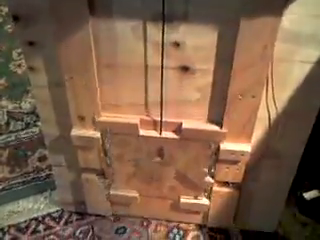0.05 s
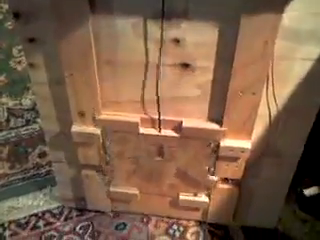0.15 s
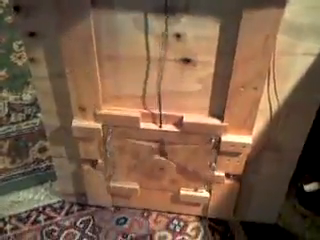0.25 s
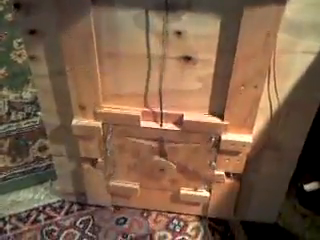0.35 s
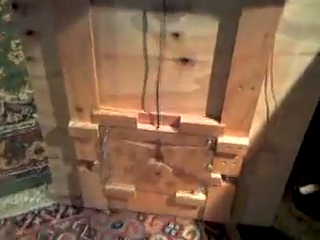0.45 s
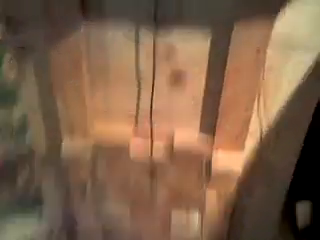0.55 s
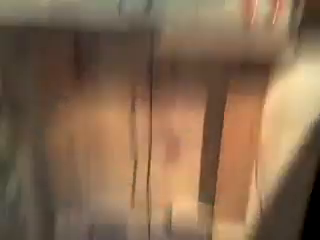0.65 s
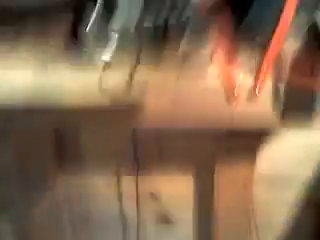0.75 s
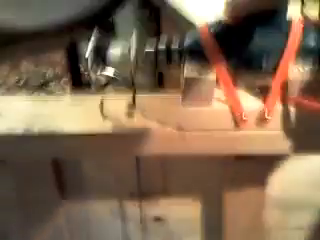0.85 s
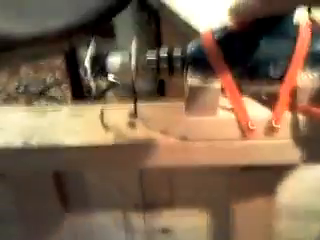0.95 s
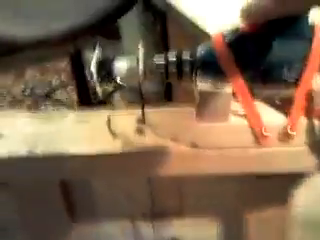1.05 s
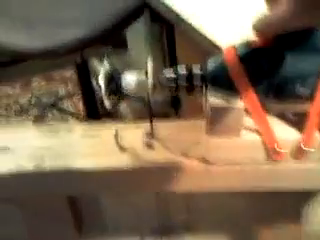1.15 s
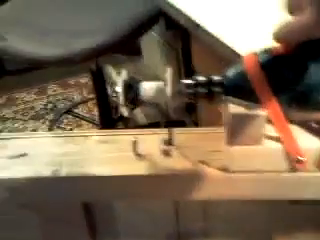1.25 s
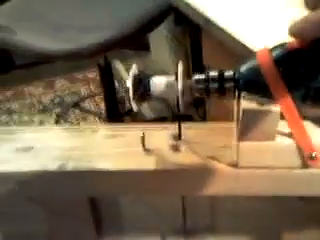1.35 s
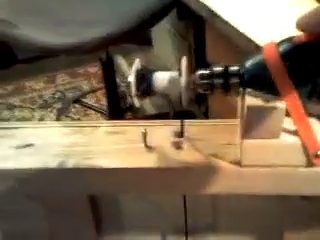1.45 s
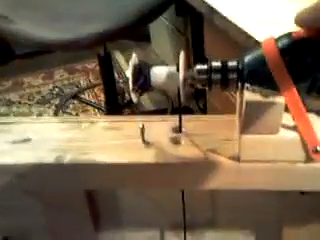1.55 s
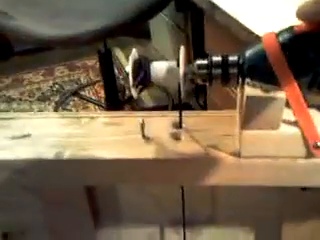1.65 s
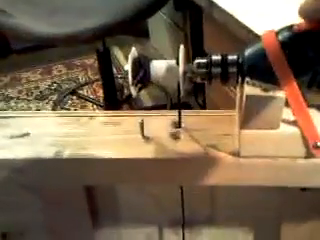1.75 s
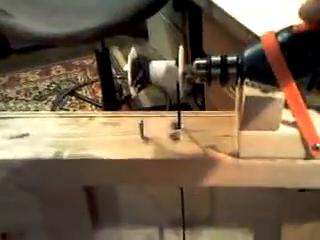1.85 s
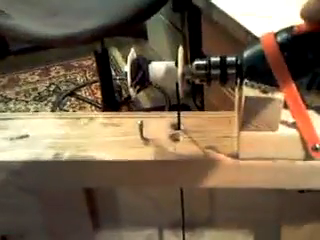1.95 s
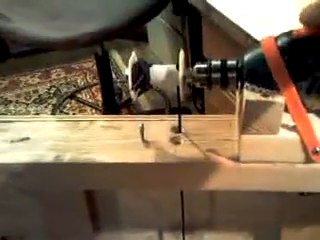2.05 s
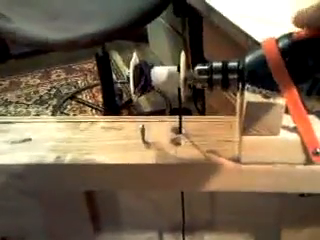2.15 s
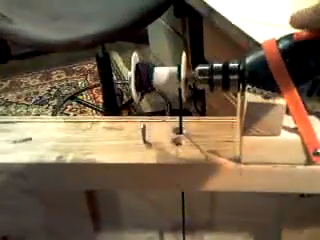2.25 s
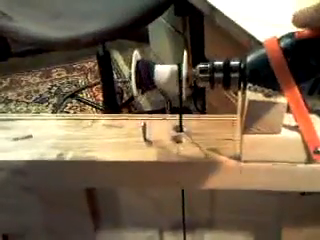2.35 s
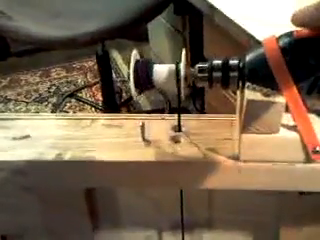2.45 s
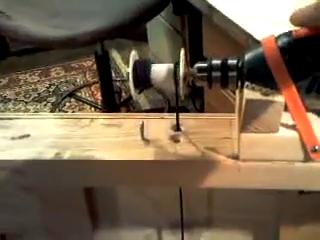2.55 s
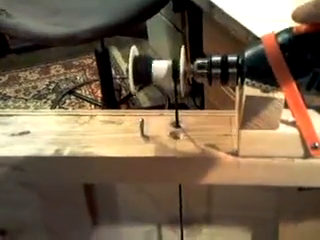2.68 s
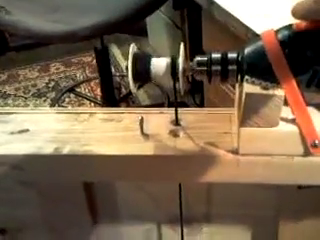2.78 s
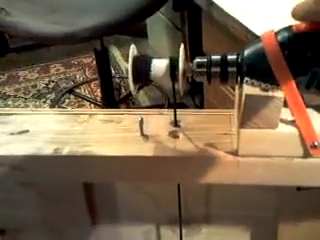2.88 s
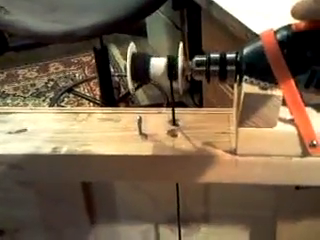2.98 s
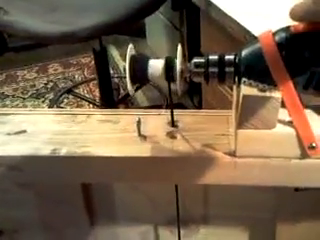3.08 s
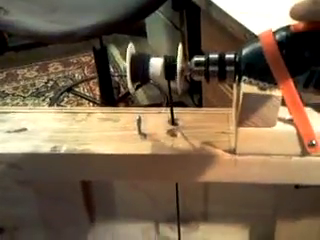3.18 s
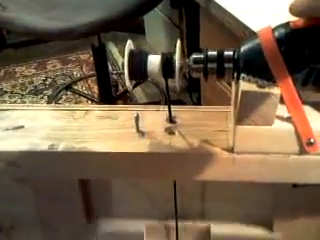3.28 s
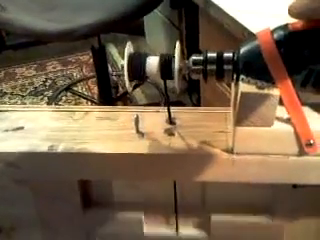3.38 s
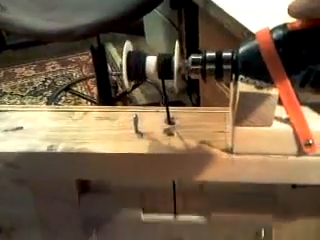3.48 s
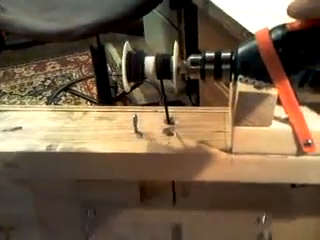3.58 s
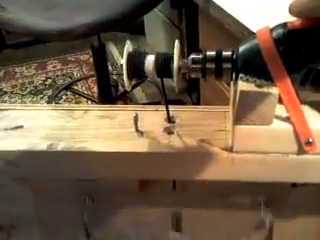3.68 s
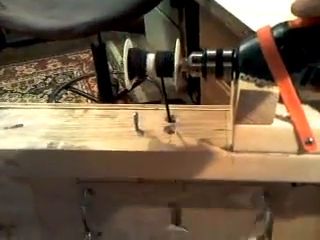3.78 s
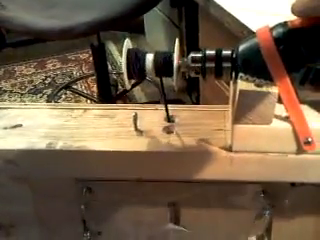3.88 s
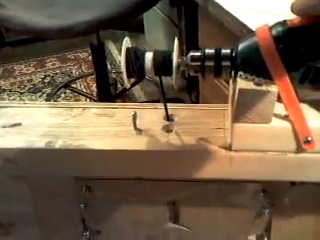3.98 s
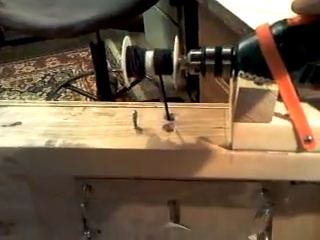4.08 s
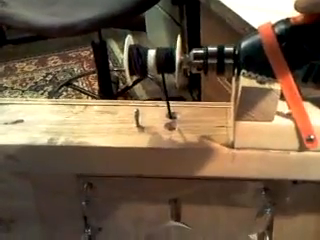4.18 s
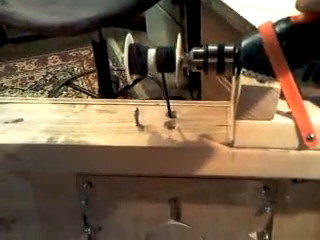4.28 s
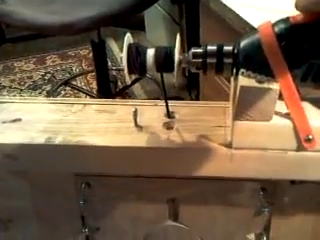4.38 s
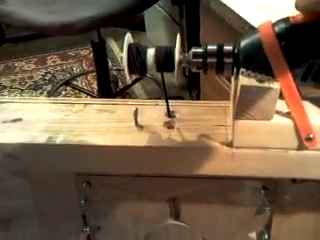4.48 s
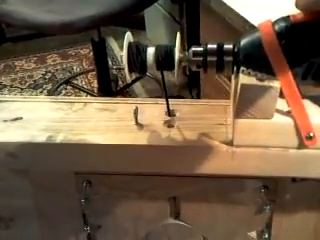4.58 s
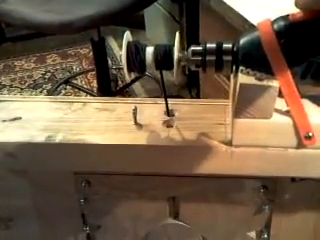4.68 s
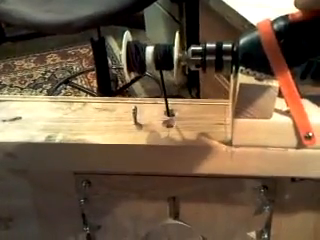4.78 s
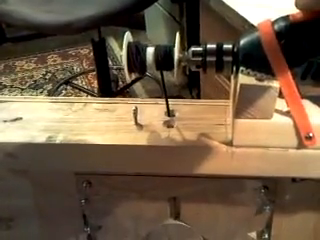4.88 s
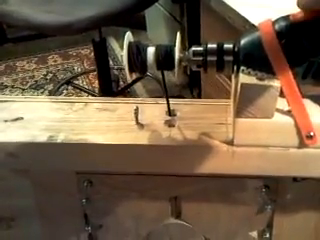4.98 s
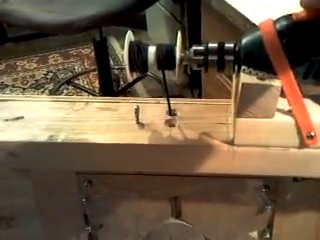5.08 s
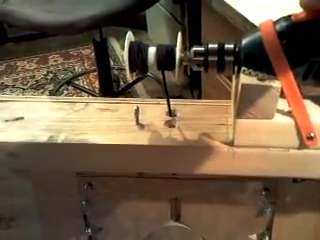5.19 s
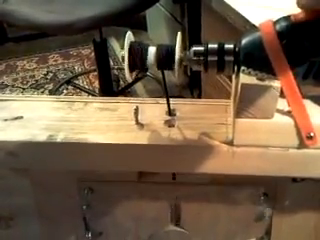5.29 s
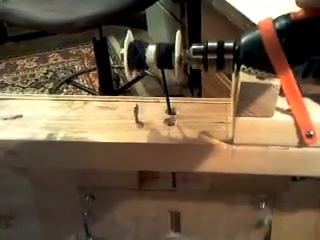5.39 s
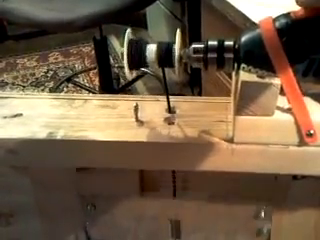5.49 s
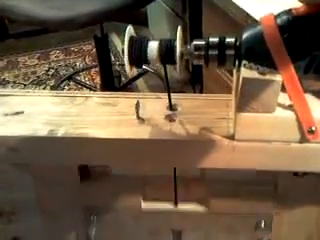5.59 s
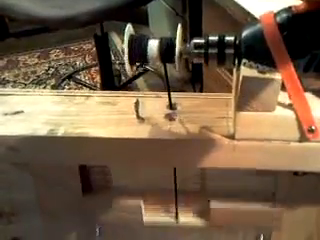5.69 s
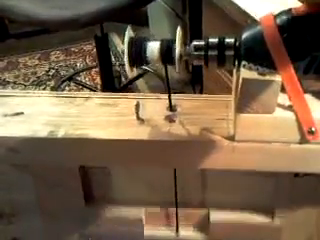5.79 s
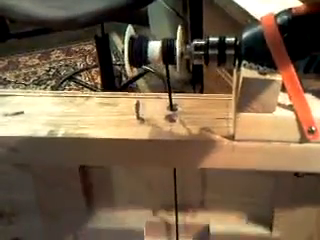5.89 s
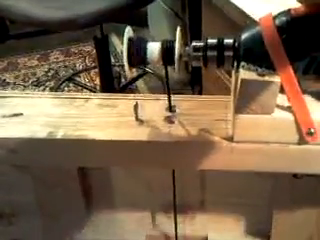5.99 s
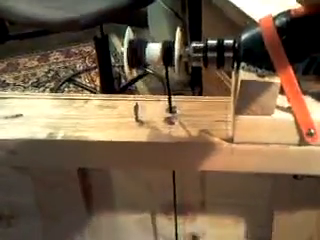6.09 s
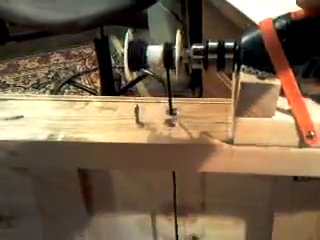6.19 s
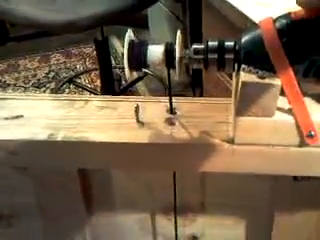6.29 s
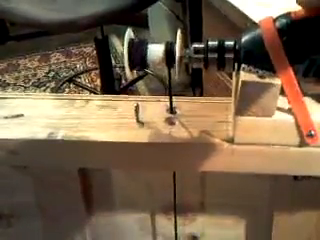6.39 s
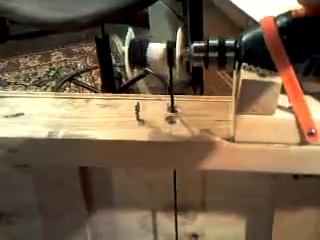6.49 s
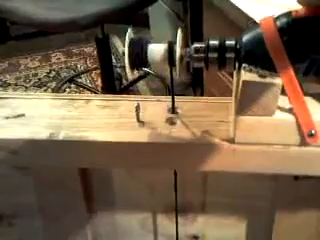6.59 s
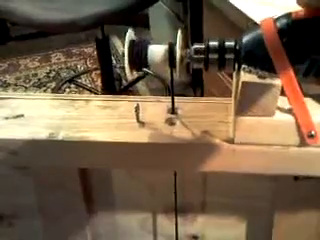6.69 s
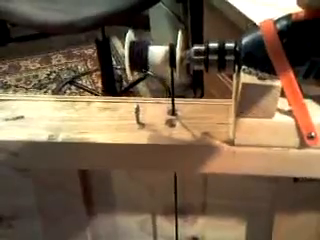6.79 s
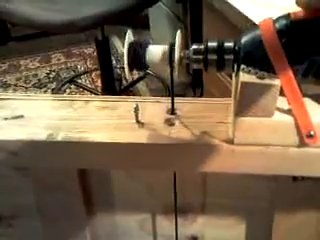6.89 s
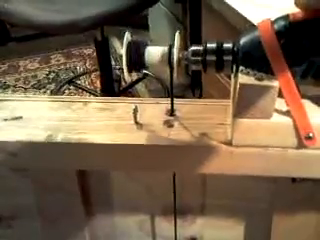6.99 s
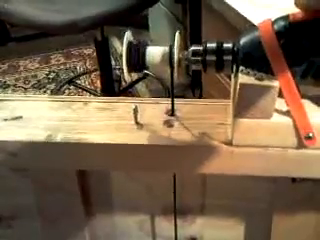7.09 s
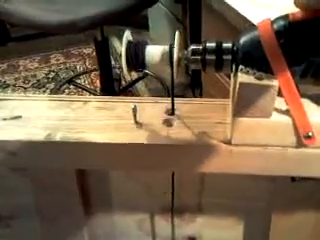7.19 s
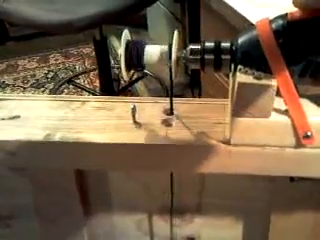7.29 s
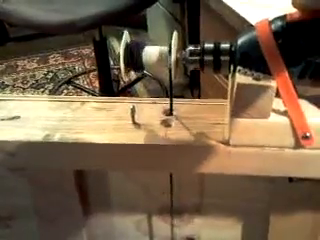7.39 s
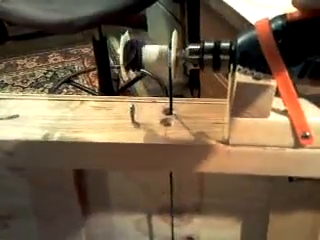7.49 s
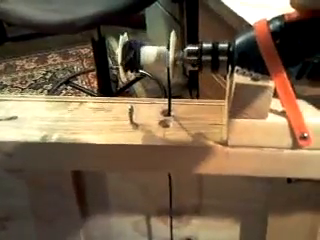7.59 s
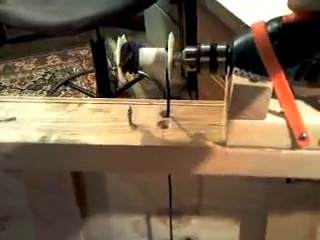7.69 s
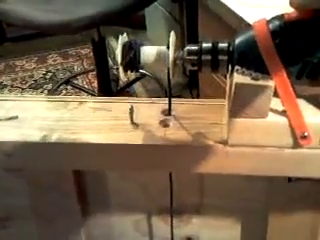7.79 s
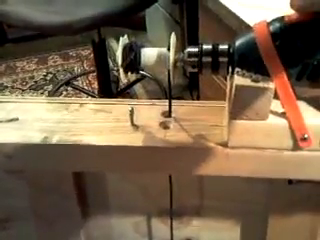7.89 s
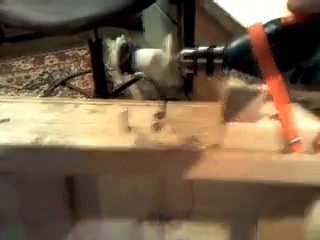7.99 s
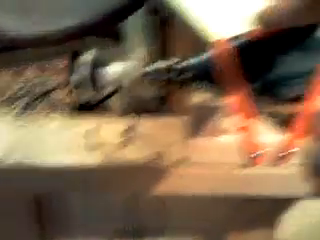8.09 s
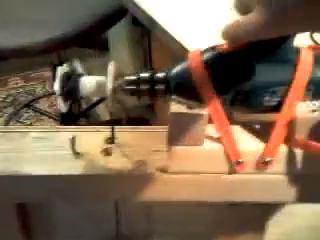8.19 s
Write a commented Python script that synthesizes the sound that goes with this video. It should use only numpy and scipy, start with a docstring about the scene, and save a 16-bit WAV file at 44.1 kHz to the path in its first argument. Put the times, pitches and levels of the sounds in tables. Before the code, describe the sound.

A cordless drill winding cord on a spool whirs briefly, then a wooden panel bumps its stop and the drive jolts. After a pause, the drill runs again with a loud clack and a rising, hissy whine, then stops. A third run speeds up, sags under load and ends in another bump and jolt. The microphone is close, in a quiet room with faint hiss, and overloads on the jolts.

```python
"""Cordless drill hoisting a panel

Close up in a quiet, carpeted room: a drill strapped to a wooden frame winds cord on a spool. It labours
up until the panel bumps its stop and the drive jolts, runs freely down, then hoists again. Ten-tooth
gearing whines over rattle and brush hiss, and the windings sing at each squeeze of the trigger.
The microphone is on a small camera close by, and it overloads on the jolts."""
import sys
import numpy as np
from scipy import signal
from scipy.fft import rfft, irfft, next_fast_len
from scipy.io import wavfile
from scipy.ndimage import uniform_filter1d

SR = 44100
rng = np.random.default_rng(int(sys.argv[2]) if len(sys.argv) > 2 else 0)


def transcribe(signal):
    """Save signal, clipped to [-1, 1], as a 16-bit WAV file at the path in sys.argv[1]."""
    frames = np.atleast_2d(signal).T
    limited = np.clip(frames, -1, 1)
    pcm = np.round(limited * 32767).astype(np.int16)
    wavfile.write(sys.argv[1], SR, pcm)


N = 363825
TIME = np.arange(N) / SR

# The motor on the last stretch up, on the way down and on the next hoist.
# Each row: time in seconds, speed in turns a second.
SPEED_NEAR_TOP = [(0.0, 69.1), (0.21, 68.4)]
SPEED_DOWN = [(2.25, 58.55), (2.32, 72.3), (2.46, 78.76), (2.6, 88.0), (2.69, 94.43), (2.77, 98.1),
              (2.91, 104.8), (3.02, 110.2), (3.24, 116.4), (3.42, 118.2), (3.61, 119.3), (3.71, 103.6),
              (3.79, 91.05), (3.92, 70), (3.97, 57.3)]
SPEED_UP = [(5.25, 34.1), (5.48, 64.42), (5.6, 74.26), (5.72, 93.6), (5.76, 98.4), (5.9, 93.35),
            (6.19, 84.3), (6.45, 77.7), (6.6, 75.53), (6.98, 72.78), (7.24, 71.36)]
# Gearbox rattle on those three runs, then brush hiss. Each row: frequency in Hz, relative density in dB.
RATTLE_NEAR_TOP = [(150, -22), (340, -15), (480, -9.5), (680, -12.5), (850, -8), (1080, 1.5), (1340, -5),
                   (1600, -14), (2200, -11), (2700, -26), (3050, -24), (4000, -31), (7000, -26.5)]
RATTLE_DOWN = [(80, -31), (150, -30), (280, -8.5), (430, -13), (600, -9.5), (900, -4), (1150, -0.5),
               (1450, -2.5), (1700, -6), (2150, -6), (2600, -13.5), (3700, -17), (5000, -41), (7000, -46)]
RATTLE_UP = [(120, -20), (240, -21.5), (340, -7.5), (430, -13), (620, -10.5), (850, -3), (1200, -0.5),
             (1450, -5.5), (1750, -12), (2150, -8.5), (2700, -21.5), (4000, -26.5), (7000, -24.5)]
BRUSH_COLOUR = [(2000, -29), (3500, -1.5), (4400, -5.5), (5300, -3.5), (5800, -6.5), (6400, 1), (7100, -6),
                (7500, -1), (8000, -1), (8900, 2), (9500, -4)]
# Resonances and hollows of the drill's housing. Each row: centre in Hz, width in Hz, lift in dB.
HOUSING_RESONANCES = [(326.3, 21, 15), (535, 46, 11), (761, 34, 14), (835, 17, 11), (1032, 110, 6.5),
                      (1258, 40, 8.5), (1935, 270, 6.5), (2820, 110, -2.5), (2944, 37, 14), (3560, 46, 3.5),
                      (4050, 290, 8), (5440, 240, -8.5), (5740, 207, 13), (7040, 900, 8.5),
                      (7950, 150, 12.5), (8500, 74, 11)]
# Strong tones swell and fade as the speed carries them through the resonances of drill and frame.
# Each row: pitch in Hz, relative level in dB.
ROTOR_RESPONSE = [(262, -61), (280, -41), (291, -36.5), (299, -28.5), (311, -23.5), (328, -33), (342, -23),
                  (358, -35)]  # three poles a turn
TOOTH_RESPONSE = [(620, -32), (700, -28.5), (750, -19.5), (810, -27.5), (865, -28.5), (900, -27.5),
                  (945, -29.5), (995, -14.5), (1040, -14), (1085, -21.5), (1145, -26), (1185, -20)]  # ten teeth a turn
GEAR_RESPONSE = [(1080, -55.5), (1260, -36), (1650, -58), (1860, -31), (1915, -26.5), (1980, -16.5),
                 (2030, -22.5)]  # seventeen a turn
OVERTONE_RESPONSE = [(1780, -49), (2000, -22.5), (2070, -38), (2150, -25), (2230, -19.5), (2300, -23),
                     (2355, -38), (2390, -23)]  # twenty a turn
# Weaker gear tones on the three runs. Each row: multiple of the motor speed, relative level in dB.
ORDERS_NEAR_TOP = [(5, -8), (7, -13), (11, -31), (13, -17), (15, -14.5), (16, -16), (18, -18), (19, -7.5),
                   (20, -9), (44, -20)]
ORDERS_DOWN = [(6, -8.5), (7, -11.5), (14, -4.5), (16, -4), (19, -5.5), (21, -9.5), (23, -10), (27, -20.5),
               (30, -6.5), (33, -15.5), (34, -21), (36, -17.5), (40, -13), (48, -26), (50, -14.5),
               (60, -15.5), (70, -20.5), (73, -21.5), (80, -18)]
ORDERS_UP = [(3, -31), (4, -18), (5, -28.5), (9, -16.5), (11, -32), (12, -25), (13, -23), (19, -9.5),
             (21, -21), (23, -18), (40, -27.5), (50, -31), (60, -29.5)]

# Steady hiss behind the drill. Each row: frequency in Hz, relative density in dB.
FLOOR_COLOUR = [(29, -44.5), (50, -0.5), (99, -7), (164, -7.5), (290, -14), (361, -10.5), (421, -17.5),
                (728, -15), (778, -17.5), (1060, -18.5), (1130, -19), (1440, -20), (2090, -28.5),
                (4000, -33), (6200, -29), (8200, -36.5), (8700, -30), (9000, -45), (9500, -33),
                (12400, -75), (20900, -120)]
# The camera's electrical thrum. Each row: multiple of THRUM_HZ, level in dB.
THRUM_PARTIALS = [(1, -43.5), (2, -46), (3, -56), (4, -52.5), (5, -55.5), (6, -58.5), (7, -57.5), (8, -57),
                  (9, -61)]
# Faint steady whistles. Each row: pitch in Hz, level in dB, rough width in Hz.
FAINT_WHISTLES = [(1040, -59.5, 11), (8700, -84, 20), (8600, -87, 20)]

# The panel bumps its stop and scuffs the frame, the drive jolts, and small clicks fall between.
# Each row: start in seconds, level in dB, tilt in dB per octave, factor on the ring time,
# and for jolts a midrange lift or dip in dB around JOLT_MID_HZ.
PANEL_BUMPS = [(.2305, -9, -0.37, 0.48), (.251, -13.5, -0.72, 0.73), (7.2645, -13, -0.48, 0.91),
               (7.288, -16, 0.06, 0.96)]
SMALL_CLICKS = [(.238, -18, 5, 0.7), (.26, -15.5, -0.5, 1.8), (.268, -9, -2, 0.31), (.715, -24, -11, 0.61),
                (.7535, -17, 1, 0.19), (2.155, -24.5, -3, 1.4), (2.412, -15, -1.5, 0.98),
                (2.427, -15.5, -0.5, 3.4), (3.874, -15.5, 1, 3), (3.884, -13.5, 6.5, 0.46),
                (5.037, -35.5, -5.5, 0.63), (5.294, -25.5, -2, 1.7), (6.316, -15, 3.5, 0.88),
                (7.267, -18, 1, 1.17), (7.276, -7, -5, 1.1), (7.297, -11, -4.5, 2),
                (8.132, -29.5, -9, 0.64)]
DRIVE_JOLTS = [(.3452, -0.5, -1.6, 0.81, -12.5), (2.4973, 6, 2, 0.47, 3.5), (7.3772, 3.5, -0.57, 0.68, -3)]
PANEL_SCUFFS = [(6.232, -15, 0.0055, 1.2)]
# The dense cloud of short modes in each kind of blow. Each row: frequency in Hz, relative density in dB.
BUMP_CLOUD = [(60, -30), (140, -15), (215, -4.5), (300, -5.5), (480, -9), (1000, -0.5), (1500, -15),
              (3000, -23), (9000, -48.5)]
CLICK_CLOUD = [(60, -17), (250, -6), (600, 3.5), (1100, 9), (1900, 1.5), (2700, -12), (4300, -11),
               (6000, -18.5), (9500, -29)]
JOLT_CLOUD = [(60, -42), (200, -12.5), (430, -3.5), (750, -1), (1000, 7), (1400, -0.5), (1700, -3),
              (2100, 0.5), (2700, -19.5), (4200, -14), (6000, -29), (9500, -43)]
SCUFF_CLOUD = [(80, -22), (150, -9), (215, 5), (310, -3), (450, -1.5), (700, -7), (1200, -9.5), (3000, -43)]
# Clear modes of the wooden frame and the drive.
# Each row: pitch in Hz, relative level in dB, seconds to fall 60 dB before the blow's ring factor.
FRAME_MODES = [(222, -8, 0.17), (309, 4.5, 0.15), (326, -3, 0.2), (507, -4, 0.024), (788, -31, 0.098),
               (2044, -16.5, 0.23)]
DRIVE_MODES = [(744, -15.5, 0.13), (964, -5.5, 0.26), (1173, -6, 0.16), (1404, -12.5, 0.14),
               (2030, -30.5, 0.15)]
# Decay of the clouds (before ring factors) and the room. Each row: frequency in Hz, seconds to fall 60 dB.
CLOUD_DECAY = [(150, 0.23), (500, 0.19), (1200, 0.13), (2500, 0.11), (5000, 0.082), (9000, 0.12)]
ROOM_DECAY = [(150, 0.49), (1000, 0.45), (3000, 0.33), (9000, 0.34)]

# Squeezes of the trigger. Each row: start in seconds, seconds to full power, share of each cycle
# that the current is on at first, level in dB.
TRIGGER_SQUEEZES = [(2.049, .3, 0.033, -38), (5.228, 0.24, 0.38, -43.5)]
# The windings under chopped current. Each row: multiple of CHOP_HZ, relative level in dB.
CHOP_PARTIALS = [(1, 0), (2, 3.5), (3, -21), (4, -20)]
# The windings' squeal at each start. Each row: start in seconds, length in seconds, level in dB.
WINDING_SQUEALS = [(2.048, 0.68, -54.5), (5.224, 0.32, -52)]
# The partials of that squeal. Each row: pitch in Hz, relative level in dB.
SQUEAL_PARTIALS = [(3916, -9), (4400, -1.5)]
# The camera's treble cut. Each row: frequency in Hz, gain in dB.
CAMERA_RESPONSE = [(20, -0.5), (9150, 0), (9600, -18.5), (10600, -30.5), (11200, -47.5), (12200, -42),
                   (12800, -75.5)]

RATTLE_KNEE, BRIGHT_KNEE = 54, 61.4  # turns a second; above these, loudness and treble level off
TUG_DB, TUGS_PER_S = 1.04, 28  # the cord tugs unevenly on the spool
SPOOL_RATIO, WOBBLE_DB = 4.7, 2.1  # motor turns to a spool turn, and how far that sways the whine
BLUR_RAD, BLUR_RAD_PER_ORDER = 0.33, 0.005  # play in the teeth smears the high tones most
JOLT_MID_HZ, JOLT_MID_OCTAVES = 870, 0.29
THRUM_HZ, CHOP_HZ, CHOP_RISE_S = 19.72, 486, 0.024


def amp(db):
    """Decibels as a gain."""
    return 10 ** (np.asarray(db) / 20)


def unit(x):
    """Scales x to an rms of one."""
    return x / np.sqrt(np.mean(abs(x) ** 2) + 1e-20)


def read(points, hz):
    """Joins rows of (Hz, value) by straight lines over log frequency."""
    f, value = np.transpose(points)
    return np.interp(np.log(hz + 1), np.log(f + 1), value)


def colour(x, spectrum):
    """Filters x by a spectrum, to an rms of one."""
    size = next_fast_len(len(x))
    gain = amp(read(spectrum, np.fft.rfftfreq(size, 1 / SR)))
    return unit(irfft(rfft(x, size) * gain, size)[:len(x)])


def drift(t, hz):
    """A random wander of rms one that changes about hz times a second."""
    return np.interp((t - t[0]) * hz, np.arange(4096), rng.standard_normal(4096)) * np.sqrt(3 / 2)


def add(mix, start_s, sound):
    """Lays a sound into the mix."""
    part = mix[max(round(start_s * SR), 0):][:len(sound)]
    part += sound[:len(part)]


def die_away(x, t60s, ring=1):
    """Lets each band of x fade at its own speed."""
    hz, t, bands = signal.stft(x, SR, nperseg=256)
    fade = amp(-60 * t / (ring * read(t60s, hz)[:, None]))
    return signal.istft(bands * fade, SR, nperseg=256)[1][:len(x)]


def tone(t, cycles, flutter, flutter_hz):
    """A tone whose phase flutters, and its strength a little."""
    shake = np.exp(flutter * (.5 * np.tanh(drift(t, flutter_hz)) + 1j * drift(t, flutter_hz)))
    return unit((shake * np.exp(2j * np.pi * cycles)).real)


def level_off(speed, knee, power):
    """A gain that grows as a power of the speed and levels off at one above the knee."""
    return 1 / (1 + (knee / speed) ** power)


def housing_db(hz):
    """How much the drill's housing lifts a sound of this pitch."""
    return sum(db / (1 + (2 * (hz - centre) / width) ** 2) for centre, width, db in HOUSING_RESONANCES)


def housed(spectrum, share):
    """A spectrum with a share of the housing's resonances laid over it."""
    hz = np.geomspace(40, 12000, 900)
    return np.transpose([hz, read(spectrum, hz) + share * housing_db(hz)])


def gear_rattle(t, turns, spectrum, uneven_db, locked, brightness):
    """Each tooth strikes the gearbox; the locked share of the pattern comes back with every turn."""
    body = housed(spectrum, 0.83)
    teeth = 10 * turns
    strengths = amp(uneven_db * np.tanh(rng.standard_normal(8192)))
    strikes = strengths[teeth.astype(int) % 8192] * np.exp(-(teeth % 1) / .5)
    loose = colour(strikes * rng.standard_normal(N)[:len(t)], body)
    patterns = rng.standard_normal((8, 200))
    weights = np.array([drift(t, 12) for _ in patterns])
    weights /= np.linalg.norm(weights, axis=0)  # the pattern changes, its strength does not
    angles = np.linspace(0, 1, 200)
    repeating = sum(w * np.interp(turns % 1, angles, p) for w, p in zip(weights, patterns))
    clatter = np.sqrt(1 - locked) * loose + np.sqrt(locked) * colour(repeating, body)
    dull = signal.sosfiltfilt(signal.butter(2, 1500, fs=SR, output="sos"), clatter)
    return dull + brightness * (clatter - dull)


def brush_hiss(turns):
    """The sparking brushes hiss, pulsing six times a turn and, more gently, once a turn."""
    pulse = 1 + 0.24 * np.cos(2 * np.pi * 6 * turns) + 0.1 * np.cos(2 * np.pi * turns)
    return colour(rng.standard_normal(N)[:len(turns)] * pulse, housed(BRUSH_COLOUR, 0.99))


def hum_and_whine(t, turns, speed, hum_db, whine_db, overtone_db, flutter):
    """The rotor's poles hum and the teeth whine; each turn of the spool sways the ten-tooth tone."""
    wobble_db = WOBBLE_DB * np.sin(2 * np.pi * turns / SPOOL_RATIO)
    out = amp(whine_db + wobble_db + read(TOOTH_RESPONSE, 10 * speed)) * tone(t, 10 * turns, flutter, 110)
    for order, response, db in ((3, ROTOR_RESPONSE, hum_db), (17, GEAR_RESPONSE, overtone_db),
                                (20, OVERTONE_RESPONSE, overtone_db)):
        out += amp(db + read(response, order * speed)) * tone(t, order * turns, 0.028 * order, 80)
    return out


def weak_gear_tones(t, turns, speed, orders):
    """Smeared tones heard through the housing; they fade as a changing speed shakes the teeth loose."""
    acceleration = uniform_filter1d(np.gradient(speed) * SR, size=4000)
    out = np.zeros(len(t))
    for order, db in orders:
        level_db = -31 + db + housing_db(order * speed) + 3.63 * drift(t, 15.01)
        out += amp(level_db) * tone(t, order * turns, BLUR_RAD + BLUR_RAD_PER_ORDER * order, 90)
    return out / np.hypot(1, acceleration / 80)


def drill(run, spectrum, orders, rattle_db, hiss_db, hiss_knee, hum_db, whine_db, overtone_db, flutter,
          uneven_db, locked, coast_s, start_s=1 / SR, spark_s=1 / SR, slack_db=0, slack_s=1 / SR):
    """Start time and sound of one run: the gears rattle, whine once their slack is taken up, and coast."""
    times, speeds = np.transpose(run)
    t = np.arange(times[0], times[-1] + coast_s, 1 / SR)
    age = t - t[0]
    driven = np.interp(t, times, speeds)
    coast = np.clip(1 - (t - times[-1]) / coast_s, 0, 1)
    speed = driven * coast
    turns = np.cumsum(speed * (1 + .002 * drift(t, 45))) / SR
    slack = np.clip(1 - age / slack_s, 0, 1)
    gear_gain = amp(slack_db * slack) * level_off(driven, RATTLE_KNEE, power=6.1)
    brightness = level_off(driven, BRIGHT_KNEE, power=8.4) * (1 - 0.81 * slack)  # slow teeth hit softly
    rattle = gear_gain * gear_rattle(t, turns, spectrum, uneven_db, locked, brightness)
    rattle *= amp(rattle_db + TUG_DB * drift(t, TUGS_PER_S))
    hiss_gain = amp(hiss_db) * np.minimum(age / spark_s, 1) * level_off(driven, hiss_knee, power=7.4)
    hiss = hiss_gain * brush_hiss(turns)
    tones = hum_and_whine(t, turns, speed, hum_db, whine_db, overtone_db, flutter)
    tones += gear_gain * weak_gear_tones(t, turns, speed, orders)
    meshed = (1 - slack) * np.clip((speed - 54) / 12, 0, 1)  # slow gears only clatter; tones need speed
    envelope = coast ** 1.12 * np.minimum(age / start_s, 1) ** 2
    return t[0], (rattle + hiss + meshed * tones) * envelope


def background():
    """Under everything: hiss, the camera's low electrical thrum and thin whistles."""
    hiss = amp(-45.5) * colour(rng.standard_normal(N), FLOOR_COLOUR)
    thrum = sum(amp(db) * unit(np.cos(2 * np.pi * (k * THRUM_HZ * TIME + rng.random())))
                for k, db in THRUM_PARTIALS)
    whistles = sum(amp(db) * tone(TIME, hz * TIME, 0.49, 2 * width) for hz, db, width in FAINT_WHISTLES)
    return hiss + thrum + whistles


def blow_lift_db(hz, tilt, mid_db=0):
    """A blow's own colour: a tilt towards bass or treble, plus a jolt's midrange lift or dip."""
    mid_band = np.exp(-(np.log2(hz / JOLT_MID_HZ) / JOLT_MID_OCTAVES) ** 2)
    return tilt * np.log2(hz / 1200) + mid_db * mid_band


def blows(rows, spectrum, cloud_ring, rise_s, modes=(), modes_db=0):
    """Each blow rings a dense cloud of short modes and any clear ones of the part it strikes."""
    out, t = np.zeros(N), np.arange(SR // 3) / SR
    for start_s, db, tilt, ring, *mid_db in rows:
        tilted = [(hz, level + blow_lift_db(hz, tilt, *mid_db)) for hz, level in spectrum]
        cloud = die_away(colour(rng.standard_normal(len(t)), tilted), CLOUD_DECAY, cloud_ring * ring)
        clear = np.zeros(len(t))
        for hz, level, t60 in modes:
            fading_db = level + blow_lift_db(hz, tilt, *mid_db) - 60 * t / (t60 * ring)
            clear += amp(fading_db) * np.sin(2 * np.pi * hz * t)
        add(out, start_s, amp(db) * (cloud + amp(modes_db) * clear) * (1 - np.exp(-t / rise_s)))
    return out


def room(x):
    """The soft tail of the carpeted room, reaching the microphone just after the direct sound."""
    t = np.arange(SR // 2) / SR
    tail = die_away(rng.standard_normal(len(t)), ROOM_DECAY) * np.clip((t - .006) / 0.029, 0, 1)
    return signal.fftconvolve(x, tail / np.linalg.norm(tail))[:N]


def windings():
    """Chopped current makes the windings sing and squeal; the singing stops at full power."""
    out = np.zeros(N)
    for start_s, length_s, first_duty, db in TRIGGER_SQUEEZES:
        t = np.arange(0, length_s, 1 / SR)
        duty = first_duty + (1 - first_duty) * t / length_s  # partials wax and wane as the pulses widen
        sing = sum(amp(level) * np.sin(np.pi * k * duty) * tone(t, k * CHOP_HZ * t, .15, 6.7)
                   for k, level in CHOP_PARTIALS)
        add(out, start_s, amp(db) * sing * np.minimum(t / CHOP_RISE_S, 1))
    for start_s, length_s, db in WINDING_SQUEALS:
        t = np.arange(0, length_s, 1 / SR)
        squeal = sum(amp(level) * tone(t, hz * t, 0.66, 164) for hz, level in SQUEAL_PARTIALS)
        add(out, start_s, amp(db) * squeal * np.minimum(t / .005, 1) * np.sqrt(1 - t / length_s))
    return out


def scene():
    """At the microphone: three runs of the drill, the knocks with their echoes, and the background."""
    motor = windings()
    add(motor, *drill(SPEED_NEAR_TOP, RATTLE_NEAR_TOP, ORDERS_NEAR_TOP, rattle_db=-24, hiss_db=-48,
                      hiss_knee=38, hum_db=-2, whine_db=-8, overtone_db=-15, flutter=0.18,
                      uneven_db=0.5, locked=0.41, coast_s=.42))
    add(motor, *drill(SPEED_DOWN, RATTLE_DOWN, ORDERS_DOWN, rattle_db=-22.5, hiss_db=-27.5, hiss_knee=76,
                      hum_db=-1.5, whine_db=1.5, overtone_db=0.5, flutter=0.46, uneven_db=0, locked=0.53,
                      start_s=0.026, spark_s=0.13, slack_db=-2.0, slack_s=0.46, coast_s=0.07))
    add(motor, *drill(SPEED_UP, RATTLE_UP, ORDERS_UP, rattle_db=-23.5, hiss_db=-42.5, hiss_knee=46.6,
                      hum_db=5, whine_db=-1.5, overtone_db=-9, flutter=0.065, uneven_db=2.5, locked=0.44,
                      start_s=0.01, spark_s=0.027, slack_db=5.0, slack_s=.35, coast_s=.5))
    panel = blows(PANEL_BUMPS, BUMP_CLOUD, cloud_ring=1.24, rise_s=0.0024, modes=FRAME_MODES, modes_db=2.5)
    panel += blows(PANEL_SCUFFS, SCUFF_CLOUD, cloud_ring=1.4, rise_s=0.014)
    jolts = blows(DRIVE_JOLTS, JOLT_CLOUD, cloud_ring=1, rise_s=0.00077, modes=DRIVE_MODES, modes_db=-1)
    clicks = blows(SMALL_CLICKS, CLICK_CLOUD, cloud_ring=.4, rise_s=.0003)
    echoes = room(amp(-15) * jolts + amp(-19) * panel + amp(-14.5) * clicks)
    return (motor + panel + jolts + clicks + echoes + background())[None]


def record(dry):
    """The microphone stage overloads, the camera cuts the treble, and the remaining peaks clip again."""
    overloaded = np.clip(dry, -.74, .74)
    narrow = irfft(rfft(overloaded) * amp(read(CAMERA_RESPONSE, np.fft.rfftfreq(N, 1 / SR))), N)
    lowpass = signal.firwin(511, cutoff=15800, window=("kaiser", 8), fs=SR)
    return signal.oaconvolve(np.clip(narrow, -.72, .72), lowpass[None], "same")


dry = scene()
out = record(dry)
transcribe(out)
```